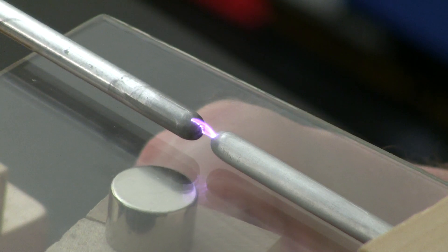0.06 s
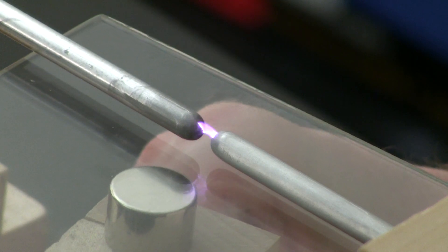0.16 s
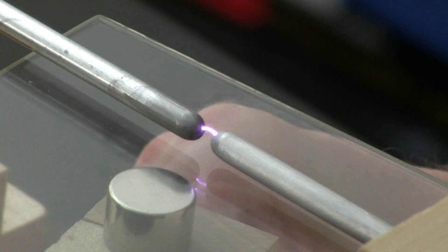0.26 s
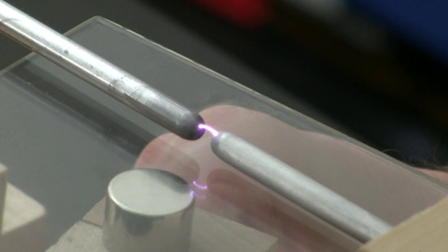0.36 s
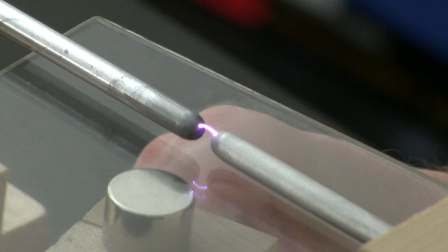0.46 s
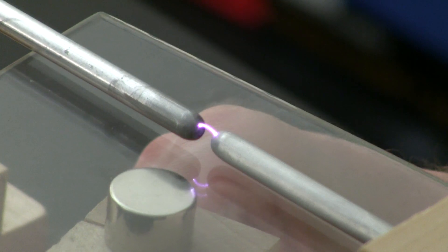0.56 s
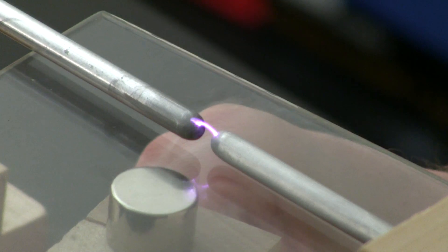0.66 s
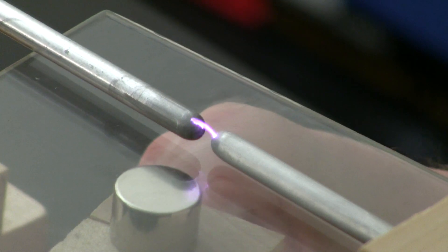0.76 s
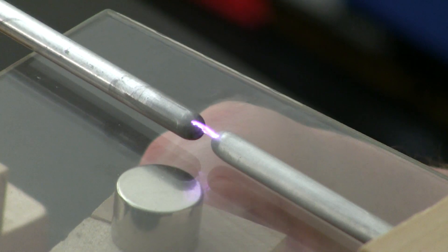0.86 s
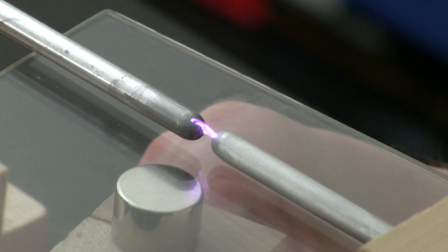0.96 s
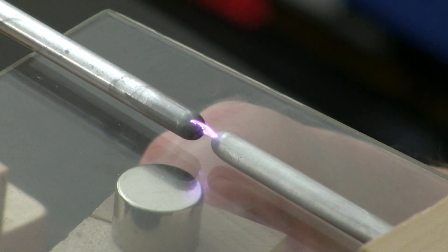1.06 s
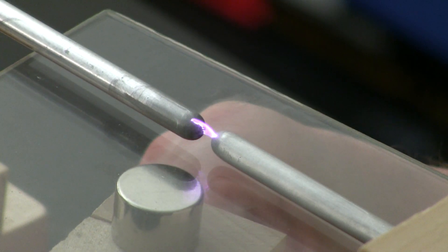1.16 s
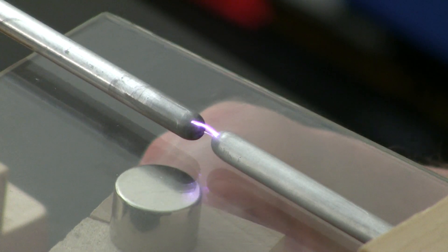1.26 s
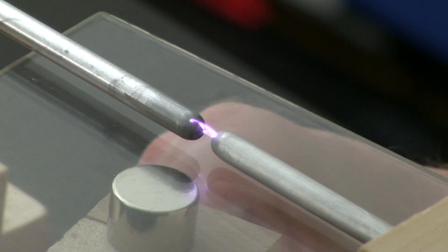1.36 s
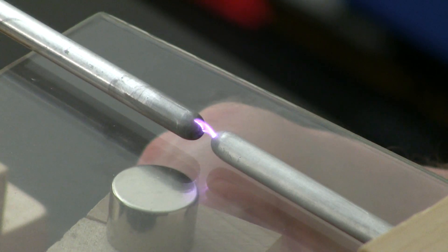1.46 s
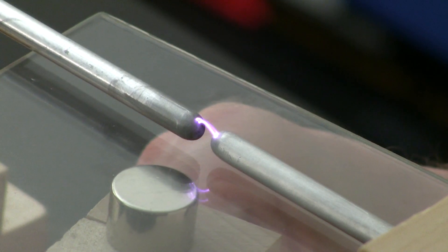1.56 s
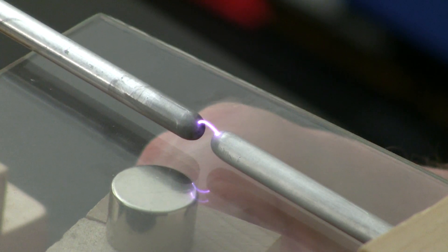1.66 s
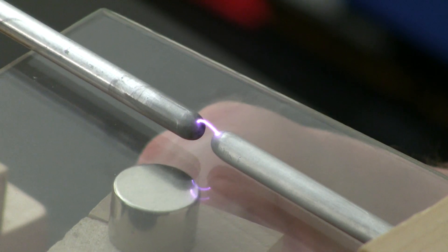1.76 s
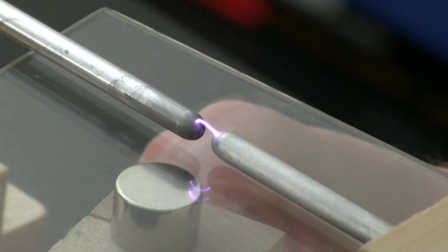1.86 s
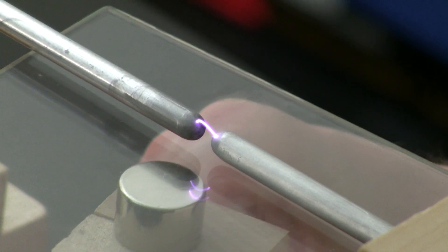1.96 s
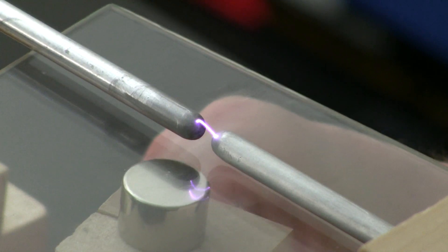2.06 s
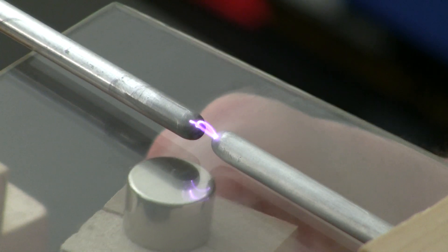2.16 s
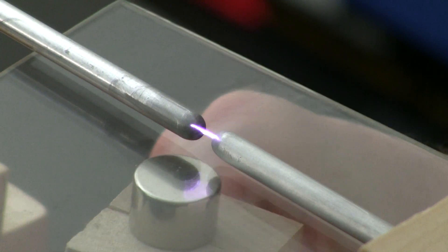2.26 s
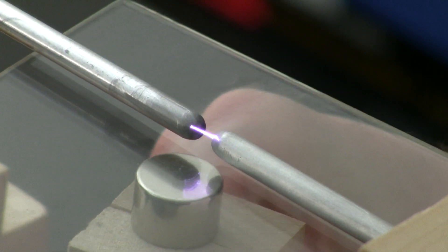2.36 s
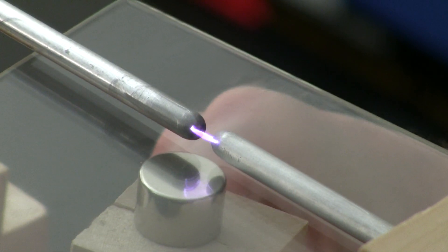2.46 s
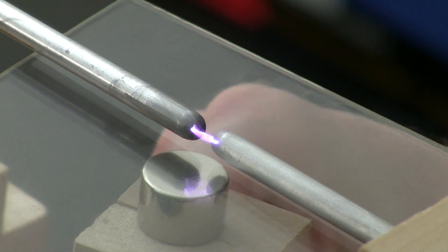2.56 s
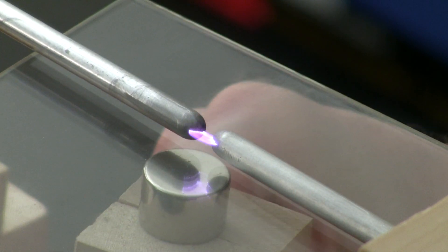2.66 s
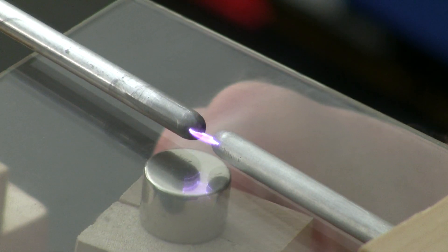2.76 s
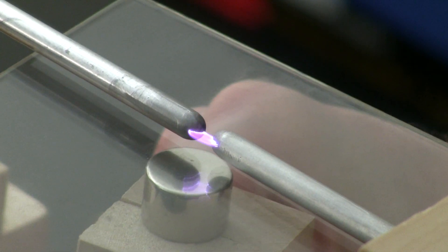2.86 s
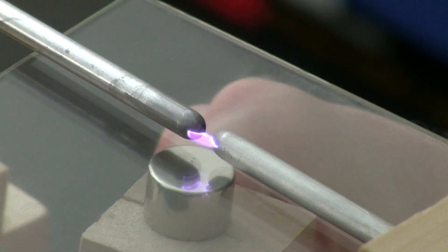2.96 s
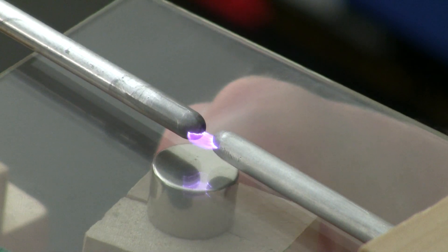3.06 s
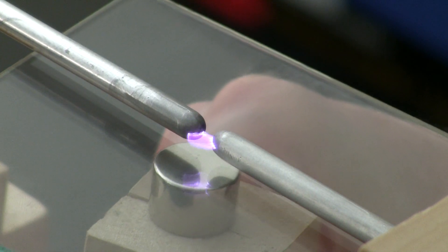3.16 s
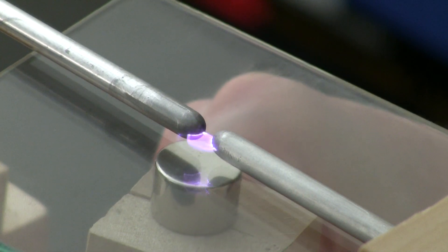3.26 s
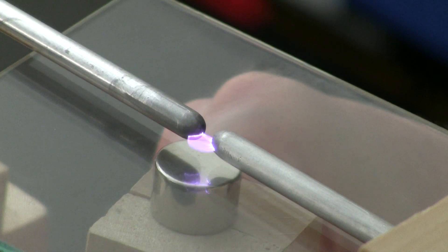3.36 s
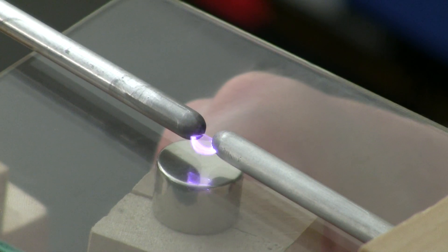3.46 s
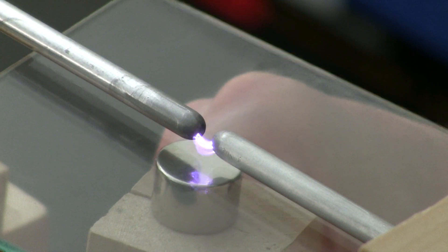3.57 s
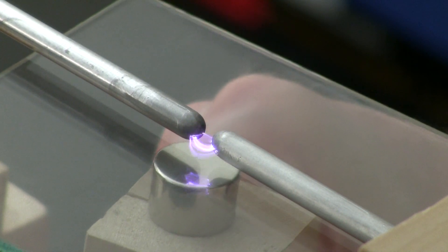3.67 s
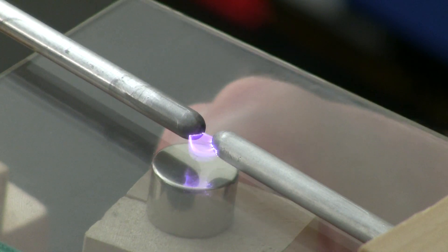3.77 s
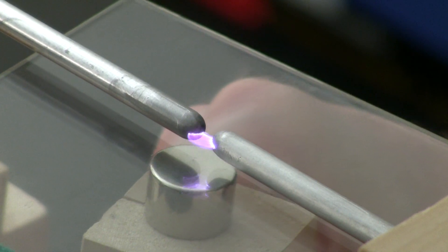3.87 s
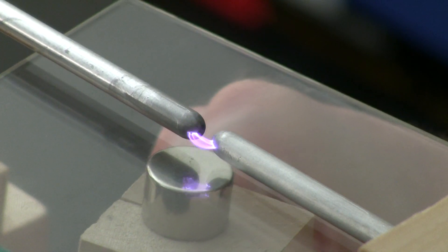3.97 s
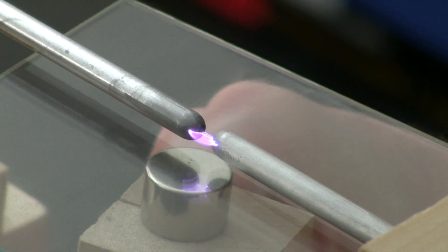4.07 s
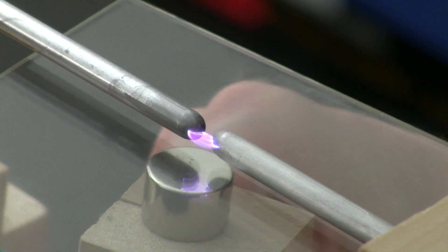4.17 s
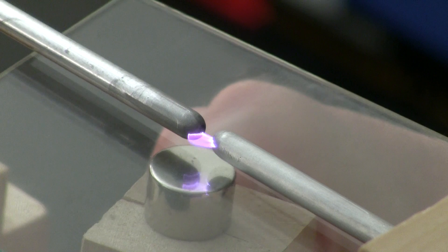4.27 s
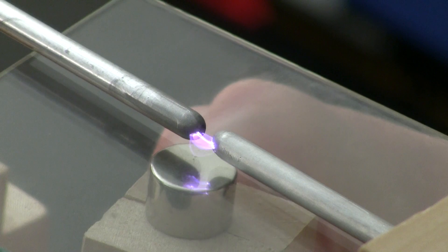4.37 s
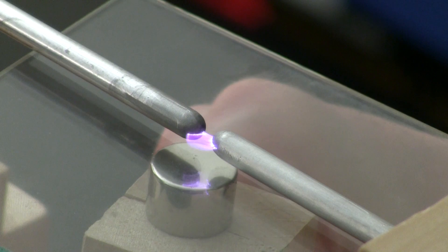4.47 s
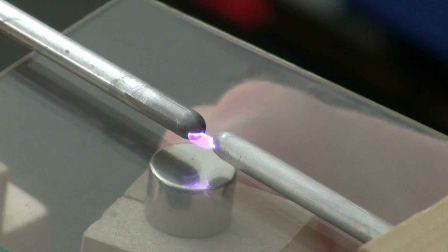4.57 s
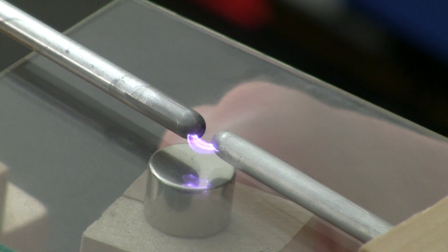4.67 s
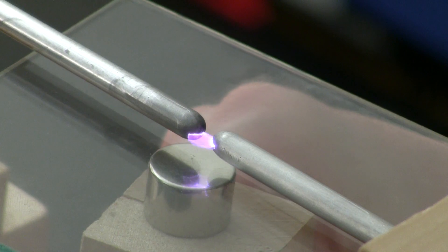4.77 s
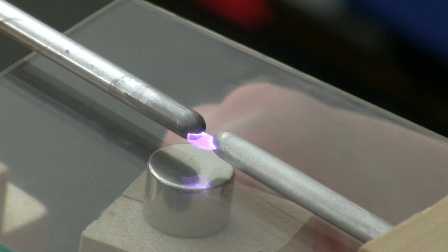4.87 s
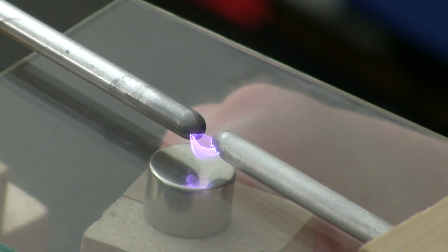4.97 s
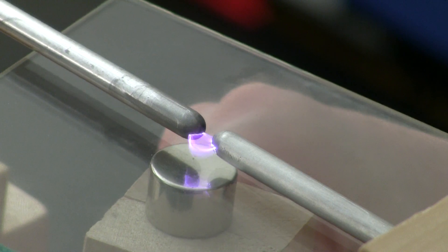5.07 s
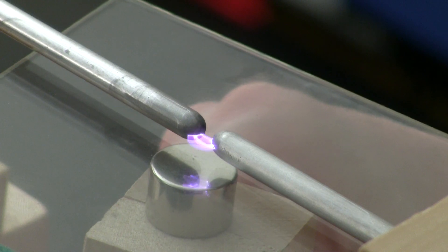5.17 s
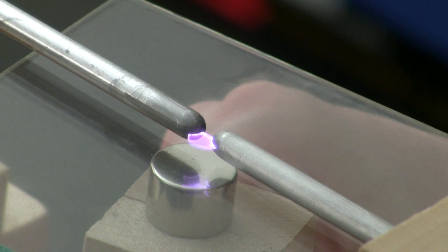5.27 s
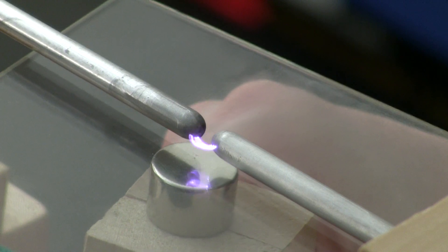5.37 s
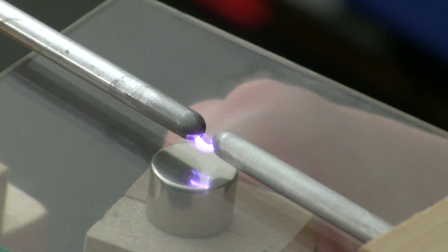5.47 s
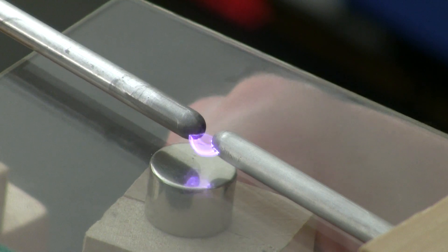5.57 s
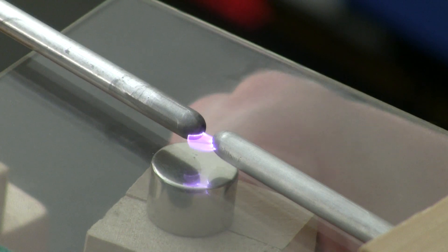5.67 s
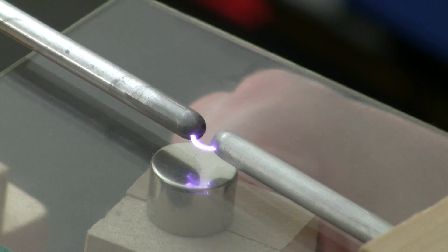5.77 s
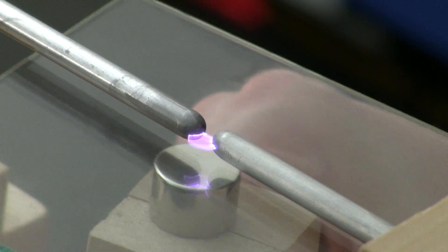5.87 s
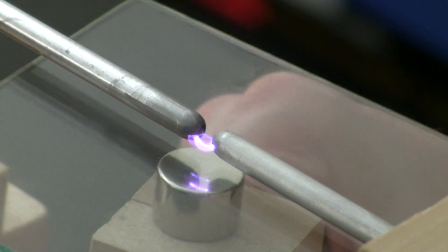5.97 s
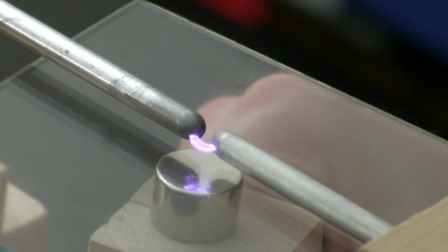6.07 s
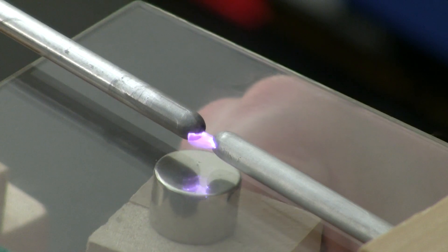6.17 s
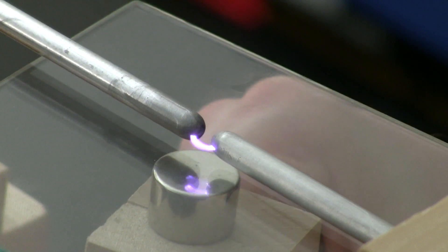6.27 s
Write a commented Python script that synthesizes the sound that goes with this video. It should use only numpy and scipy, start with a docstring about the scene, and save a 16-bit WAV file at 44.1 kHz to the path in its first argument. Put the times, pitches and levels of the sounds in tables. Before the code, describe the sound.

Over soft airy ventilation and low mains hum, tiny sharp zaps tick quickly, drop out for almost half a second, return, then drop out longer. A fierce high-voltage crackle follows, harsh and treble-heavy, its fast buzzing relights interrupted by brief chirping squeals that mostly glide upward. Close stereo microphone, short room ring, background dipping beneath the loud arc.

```python
"""A harsh electric crackle, close by in a small room: lone snaps with two drop-outs, then a fast stutter
that keeps breaking into longer, gliding squeals, over mains hum and ventilation.
A high-voltage arc between two metal rods makes thousands of tiny sparks a second, in bursts. Each spark is
a sharp coloured click, echoed by the room. Hum is a few sine tones and ventilation is shaped noise.
A gain control turns everything down while the arc is loud."""
import sys
import numpy as np
from scipy import signal
from scipy.fft import rfft, irfft
from scipy.io import wavfile

SR = 44100
rng = np.random.default_rng(int(sys.argv[2]) if len(sys.argv) > 2 else 0)


def dump(signal):
    """Clip the signal to [-1, 1] and save it as 16-bit WAV at the path in sys.argv[1]."""
    limited = np.clip(np.atleast_2d(signal).T, -1, 1)
    pcm = np.round(limited * 32767).astype(np.int16)
    wavfile.write(sys.argv[1], SR, pcm)


N = 278271  # length in samples
LEAD = SR // 20  # samples computed ahead of the start, where the arc is already burning

# long bursts of the arc: start t/s, length t/s, sparks per second in mid-burst f/Hz, name of the glide
LONG_BURSTS = [(2.5277, .0072, 3800, "sag"), (2.541, .0095, 4000, "sag"), (2.555, 0.0094, 4100, "sag"),
               (2.573, 0.012, 3900, "sag"), (2.592, 0.016, 4550, "sag"), (2.616, 0.01, 3800, "sag"),
               (2.634, .006, 3700, "sag"), (2.646, 0.0089, 4600, "sag"), (2.662, .02, 3800, "rasp"),
               (2.69, .007, 3900, "sag"), (2.707, 0.021, 4400, "sag"), (3.473, 0.014, 4270, "arch"),
               (3.492, 0.022, 6300, "rise"), (3.529, 0.023, 4700, "rasp"), (3.553, .024, 6400, "rise"),
               (3.603, .012, 4290, "arch"), (3.62, 0.035, 5200, "swoop"), (3.655, 0.01, 8100, "rise"),
               (3.733, 0.014, 3960, "arch"), (3.752, .019, 5900, "rise"), (3.778, 0.012, 7000, "rise"),
               (3.792, 0.011, 4650, "arch"), (3.831, 0.0096, 4240, "arch"), (3.843, 0.022, 3900, "rasp"),
               (3.87, .015, 5800, "rise"), (3.894, 0.026, 5700, "hook"), (4.021, .013, 4200, "arch"),
               (4.04, 0.02, 6000, "rise"), (4.069, 0.031, 4800, "rasp"), (4.105, .011, 3900, "sag"),
               (4.134, 0.014, 4100, "sag"), (4.262, .0096, 3420, "rasp"), (4.275, 0.058, 4530, "swoop"),
               (4.426, 0.016, 4440, "arch"), (4.447, 0.017, 6300, "rise"), (4.688, .028, 4820, "swoop"),
               (4.734, 0.019, 5600, "hook"), (4.764, 0.027, 4730, "swoop"), (4.795, 0.019, 6700, "rise"),
               (5.014, 0.012, 3700, "arch"), (5.031, 0.022, 3700, "rasp"), (5.056, 0.016, 5300, "rise"),
               (5.148, 0.015, 4570, "arch"), (5.168, 0.019, 6000, "rise"), (5.194, .02, 5850, "rise"),
               (5.215, .029, 6000, "hook"), (5.379, .013, 4000, "arch"), (5.397, 0.032, 4100, "rasp"),
               (5.441, .023, 5040, "rise"), (5.478, 0.017, 5500, "hook"), (5.498, 0.016, 6200, "rise"),
               (5.52, 0.021, 5900, "rise"), (5.63, .012, 4000, "arch"), (5.645, 0.028, 4300, "rasp"),
               (5.684, 0.019, 6500, "rise"), (5.785, 0.022, 4850, "arch"), (5.809, 0.022, 5900, "rise"),
               (5.838, .017, 6200, "rise"), (5.856, .03, 6500, "rise"), (6.013, .015, 4430, "arch"),
               (6.032, 0.02, 5900, "hook"), (6.125, 0.011, 4300, "arch"), (6.144, 0.025, 6400, "rise"),
               (6.17, .017, 6100, "rise"), (6.19, .024, 6800, "rise"), (6.294, 0.013, 4360, "arch")]


def arc(treble_hz=9100.0, order=4, spark_db=1.53):
    """Every spark heats the air in an instant and sends out a sharp pressure pulse; the arc is their sum."""
    # lone snaps before the arc holds: start t/s, length t/s, sparks per second in mid-burst f/Hz
    lone_snaps = [(-.009, 0.0027, 4000), (0.031, 0.0039, 4370), (.069, 0.0025, 4240),
                  (0.1102, 0.0031, 4170), (0.1476, 0.0042, 4320), (0.185, .0037, 4230), (.23, .003, 5000),
                  (.2766, 0.0053, 4960), (.3166, .0028, 4340), (.7675, 0.0044, 5500),
                  (0.7737, 0.0039, 4200), (.821, 0.0025, 3640), (.864, 0.0067, 4500), (.907, 0.0099, 4400),
                  (.934, 0.004, 3270), (0.9676, .0021, 3140), (.9993, 0.0033, 3670), (1.038, .003, 3900),
                  (1.076, 0.0035, 4030), (1.1097, 0.0051, 3800), (1.143, 0.0031, 3700),
                  (1.1787, 0.002, 3700), (1.2076, 0.0035, 3900), (1.2464, 0.0031, 3600),
                  (1.2794, 0.003, 3800), (1.3223, .0098, 5600), (1.3653, 0.0027, 3600),
                  (1.4015, 0.006, 3830), (1.439, .0037, 4000), (1.4833, 0.0029, 3860),
                  (1.526, 0.0031, 3900), (1.572, 0.0048, 5800), (2.2447, .0005, 4020),
                  (2.2486, .0044, 4570), (2.299, 0.0066, 4600)]
    # state of the discharge: t/s, strength level/dB, extra treble level/dB
    drive = [(0, 1.5, -7), (1.5, 0.54, -8), (2.25, 1.6, -12), (2.38, 2, -4), (2.6, 0.5, -0.5), (3.1, 0, 2),
             (3.45, 0, 3.5), (3.7, -0.4, 4), (6.3, -1, 3.5)]
    # colour of one spark: f/Hz, left level/dB, right level/dB
    spark_colour = [(150, -51, -49), (1030, -17.5, -23.5), (1530, -8.5, -10.5), (2840, -11, -9),
                    (3430, -4, -3), (3910, -5.5, -5.5), (4920, -1.5, -2.5), (7500, -4, 1.5), (8270, -7, -3),
                    (9970, -9.5, -5.5), (11500, -4.5, -1.5), (12900, 3, -3.5), (13900, -2.5, -2.5),
                    (15200, 1.5, -6)]

    bursts = [snap(*row) for row in lone_snaps]
    bursts += [squeal(*row) for row in LONG_BURSTS]
    bursts += stutter()
    times, sizes = np.hstack([with_bounce(*sparks(*burst)) for burst in bursts])

    # a grid "order" times finer lets a spark fall between two samples
    t = np.arange(-LEAD, N) / SR
    places = np.round((times * SR + LEAD) * order).astype(int)
    fine = np.bincount(places, sizes, len(t) * order)
    pulses = order * signal.resample_poly(fine, 1, order)[:len(t)]

    s, *columns = np.transpose(drive)
    strength_db, treble_db = [np.interp(t, s, column) for column in columns]
    low = signal.sosfilt(signal.butter(1, treble_hz, fs=SR, output="sos"), pulses)
    treble = pulses - low
    pulses = low + from_db(treble_db) * treble
    pulses = pulses * from_db(spark_db + strength_db)
    return signal.fftconvolve(pulses[None], causal_click(spark_colour))


def sparks(start, length, first, middle, last, rough, level_db, full_hz=4045.0, charge_power=1.45,
           size_spread=0.06, soft_start=0.47, soft_end=0.32, swell=0.0015, scatter=.000011, count=400):
    """Times and sizes of one burst: faster sparks have less time to charge, so are weaker and less steady."""
    along = np.linspace(0, 1, count)  # position in the burst, from start to end
    # the spark rate is a smooth curve through its start, middle and end
    rate = np.polyval(np.polyfit([0, .5, 1], [first, middle, last], 2), along)
    cycles = np.cumsum(rate) * length / count

    # uneven waits, where 1 is the regular spacing
    waits = np.clip(1 + rough * middle / full_hz * rng.standard_normal(count), .5, 2)
    fired = np.cumsum(waits) - waits[0]
    alive = fired < cycles[-1]
    where = np.interp(fired[alive], cycles, along)
    haste = np.interp(where, along, rate) / full_hz

    growing = 1 - soft_start * np.exp(-length * where / swell)  # the first sparks are small
    growing = growing * (1 - soft_end * np.exp(-length * (1 - where) / swell))  # and so are the last
    path, luck = rng.standard_normal((2, count))[:, alive]  # every spark takes its own path across the gap
    charge = (waits[alive] / haste) ** charge_power
    sizes = growing * charge * np.maximum(1 + size_spread * haste ** 2 * luck, 0)
    times = start + length * where + scatter * haste * path
    return times, sizes * from_db(level_db)


def snap(start, length, rate, fall=0.16, rough=0.054):
    """A short burst: the sparks slow down as the supply sags."""
    return start, length, rate * (1 + fall), rate, rate * (1 - fall), rough, 0


def squeal(start, length, rate, glide):
    """A long burst: as the arc is pushed aside, its spark rate follows one of the glides."""
    # by name: spark rate at start and end (as multiples of the middle), timing roughness (0-1), level/dB
    glide_shapes = {"sag": (1.2, .78, .05, 0.44), "arch": (0.74, .86, 0.057, 1.44),
                    "rasp": (1.17, 1.02, .115, 0.41), "swoop": (0.99, 2, .09, 1.39),
                    "hook": (1.2, 1.4, 0.028, 0.53), "rise": (.92, 1.6, .04, 0.43)}
    first, last, rough, level_db = glide_shapes[glide]
    return start, length, rate * first, rate, rate * last, rough, level_db


def stutter(spark_hz=3177.0, hurry=0.00051, uneven=.04, length_spread=0.17, rate_spread=0.033,
            fall=0.2, rough=0.053, clearance=.004, count=700):
    """The arc relights again and again between squeals: quick and thin in hot air, slower and fuller as it cools."""
    # pace once the arc holds: t/s, relightings per second f/Hz, burst length t/s, both for cool air
    pace = [(2.3186, 62.3, 0.0036), (2.389, 88, 0.0022), (2.498, 94.4, 0.0031), (2.803, 105.4, 0.0039),
            (3.18, 122, 0.0028), (3.27, 155, .0017), (3.357, 117, 0.0025), (3.412, 193, .0012),
            (3.601, 125, .0028), (4.222, 122.6, 0.0034), (4.65, 134, .0019), (4.92, 127, 0.0027),
            (6.3, 133, .0023)]
    # air left hot by a long burst relights sooner, in briefer bursts, until it has cooled
    hot_speedup, hot_shortening = .45, 2.8
    cooling_s, relight_s = .036, .0045

    spreads = np.array([uneven, length_spread, rate_spread])
    luck = iter(np.exp(spreads * rng.standard_normal((count, 3))))
    s, per_s, lengths = np.transpose(pace)
    bursts, now, hot_until = [], pace[0][0], 0
    for start, length, *_ in LONG_BURSTS:
        while now < start:
            wait_luck, length_luck, rate_luck = next(luck)
            heat = 1 + hot_speedup * np.exp((hot_until - now) / cooling_s)
            burn = np.interp(now, s, lengths) * length_luck / heat ** hot_shortening
            if now + burn + clearance < start:
                # the briefest bursts end before their sparks have slowed down
                rate = spark_hz * rate_luck * (1 + hurry / burn)
                bursts.append(snap(now, burn, rate, fall, rough))
            now += wait_luck / (np.interp(now, s, per_s) * heat)
        now = hot_until = start + length + relight_s
    return bursts


def with_bounce(times, sizes, bounce=0.32, nearest=.00006, farthest=0.0003965):
    """Metal beside the gap reflects each spark; the delay (s) differs by burst as the arc wanders."""
    delay = rng.uniform(nearest, farthest)
    return np.r_[times, times + delay], np.r_[sizes, bounce * sizes]


def room_response(build_up=0.001, ear_spread=.000022, room_db=-6.5):
    """Direct sound, near echoes, and a diffuse tail of noise bands that each die away at their own pace."""
    # echoes from the bench and things on it: delay t/s, level/dB against the direct sound
    near_echoes = [(.00052, -24), (.00125, -20.5), (.0061, -25.5)]
    # ring of the room: f/Hz, time to fall by 60 dB t/s, relative level/dB, left-right likeness (0-1)
    room_ring = [(3500, 0.26, 0.5, 1), (4900, 0.44, -3, 0.24), (7050, 0.37, -3.5, 0), (9340, 0.23, 2.5, 0),
                 (14100, 0.19, -5, 0)]

    t = np.arange(SR // 2) / SR
    edges = np.geomspace(700, 17000, num=10)
    response = np.zeros((2, len(t)))
    for low, high in zip(edges, edges[1:]):
        t60, level_db, alike = at_hz(room_ring, np.sqrt(low * high))
        band_filter = signal.butter(2, [low, high], "band", fs=SR, output="sos")
        mid, side = signal.sosfilt(band_filter, rng.standard_normal(response.shape))
        alike = np.clip(alike, -1, 1)
        # the side noise has opposite signs left and right, so it makes the ears differ
        band = np.sqrt(1 + alike) * mid + np.sqrt(1 - alike) * side * np.array([[1], [-1]])
        response += band * from_db(level_db) * np.exp(-np.log(1000) * t / t60)
    response *= 1 - np.exp(-t / build_up)
    response *= from_db(room_db) / np.sqrt(np.sum(response ** 2) / 2)

    for delay, level_db in near_echoes:
        delays = np.abs(delay + ear_spread * rng.standard_normal(2))  # one for each ear
        at = np.round(delays * SR).astype(int)
        response[[0, 1], at] += from_db(level_db)
    response[:, 0] += 1  # the direct sound
    return response


def background(side_share=1.0, lean_db=0.87):
    """Ventilation is wide, shaped noise; mains hum is a few steady sines; both lean a little to the right."""
    # mains hum: f/Hz, rms level/dB before the lean to the right
    hum_tones = [(59.5, -61.5), (119.7, -54), (300, -65.5)]
    # colour of ventilation and hiss: f/Hz, relative level/dB
    air_colour = [(20, -15), (50, 1.5), (200, 0.5), (320, 0.5), (430, -2), (560, -2.5), (1000, -10),
                  (2000, -15.5), (7500, -20.5), (10000, -23), (13500, -21.5), (16000, -23)]
    # level of ventilation and hiss before the lean: t/s, level/dB
    air_level = [(.7, -45.5), (1.8, -47.5), (3.3, -45), (6.3, -45.5)]

    t = np.arange(N) / SR
    colour = from_db(at_hz(air_colour, np.fft.rfftfreq(N, 1 / SR)))
    mid, side = irfft(rfft(rng.standard_normal((2, N))) * colour, N)
    air = mid + side_share * side * np.array([[1], [-1]])
    air *= from_db(at_time(air_level, t)) / air.std()

    hum = np.zeros(N)
    for hz, level_db in hum_tones:
        tone = np.sin(2 * np.pi * (hz * t + rng.random()))
        hum += np.sqrt(2) * from_db(level_db) * tone  # root 2 turns rms into peak
    return (air + hum) * from_db([[-lean_db], [lean_db]])


def gain_control(x, knee_db=-15.0, follow_s=0.033, squeeze=0.47):
    """The gain falls as the recent power grows, so the background dips under each flare."""
    keep = np.exp(-1 / (follow_s * SR))
    power = signal.lfilter([1 - keep], [1, -keep], np.mean(x ** 2, axis=0))
    return x / (1 + power / from_db(knee_db) ** 2) ** squeeze


def causal_click(rows, size=512):
    """The click with the given left and right spectra whose energy comes earliest (minimum phase)."""
    spectrum = from_db(at_hz(rows, np.fft.rfftfreq(size, 1 / SR)))
    cepstrum = irfft(np.log(spectrum))
    # folding the second half onto the first leaves nothing ahead of the click
    cepstrum[:, 1:size // 2] *= 2
    cepstrum[:, size // 2 + 1:] = 0
    return irfft(np.exp(rfft(cepstrum)))


def from_db(db):
    """Decibels to gain."""
    return 10 ** (np.asarray(db) / 20)


def at_time(rows, s):
    """A curve read at the given times."""
    return np.interp(s, *np.transpose(rows))


def at_hz(rows, hz):
    """Every column of a table read on a log-frequency axis."""
    points, *columns = np.transpose(rows)
    log_hz = np.log(np.maximum(hz, 1))
    return np.array([np.interp(log_hz, np.log(points), column) for column in columns])


def scene():
    """The arc in its room, over the background."""
    room, floor = room_response(), background()
    return signal.fftconvolve(arc(), room, axes=1)[:, LEAD:LEAD + N] + floor


def record(dry, cutoff_hz=15750):
    """Gain control, then the top is cut steeply."""
    top_cut = signal.ellip(12, .1, 80, cutoff_hz, fs=SR, output="sos")
    return signal.sosfilt(top_cut, gain_control(dry))


dry = scene()
out = record(dry)
dump(out)
```